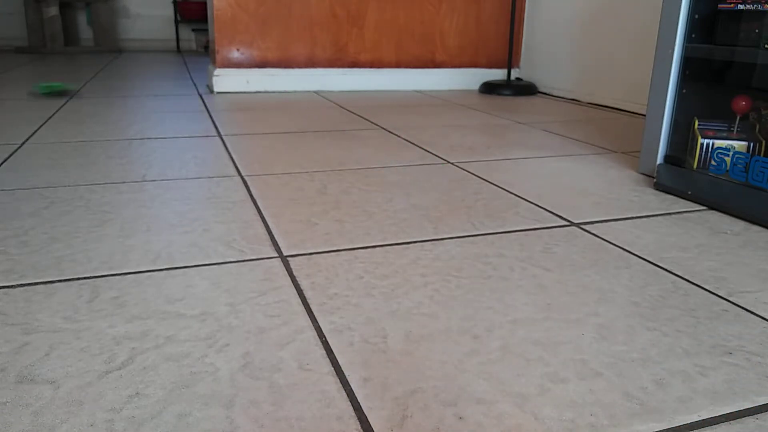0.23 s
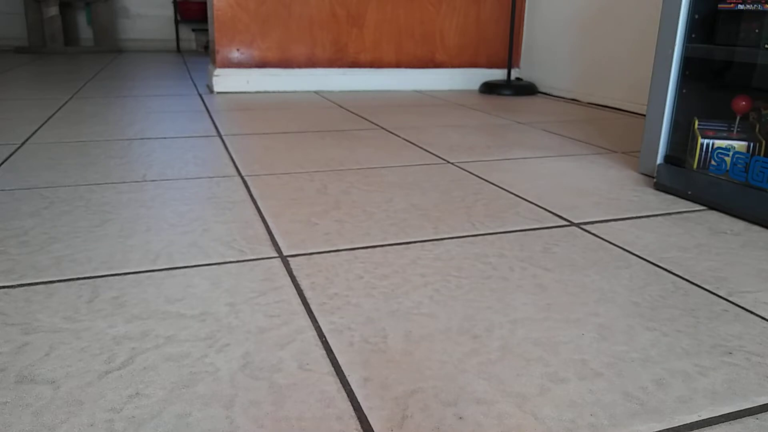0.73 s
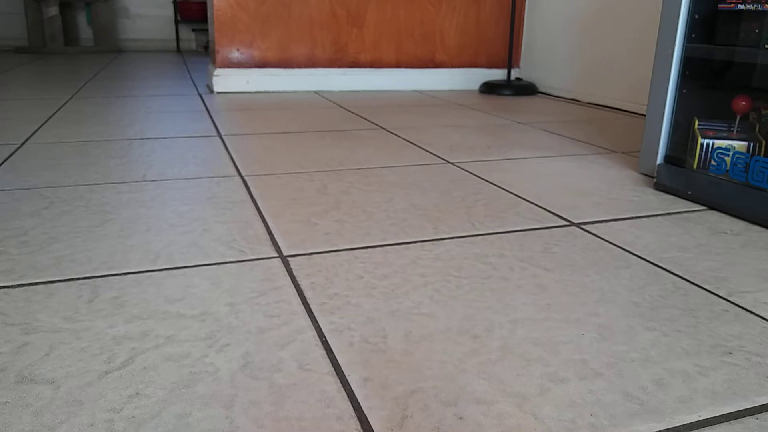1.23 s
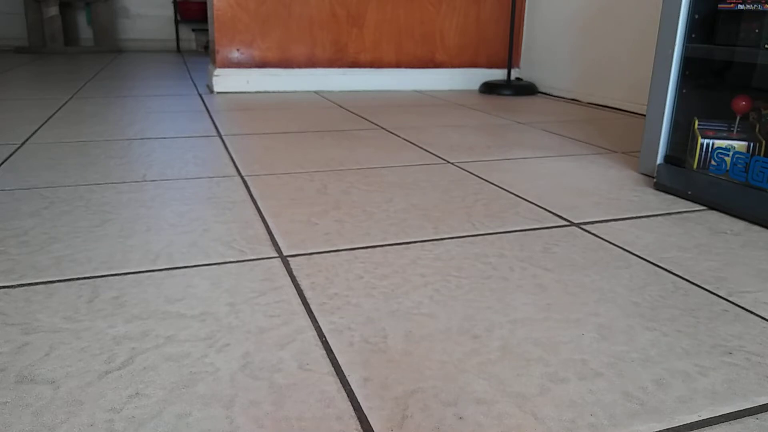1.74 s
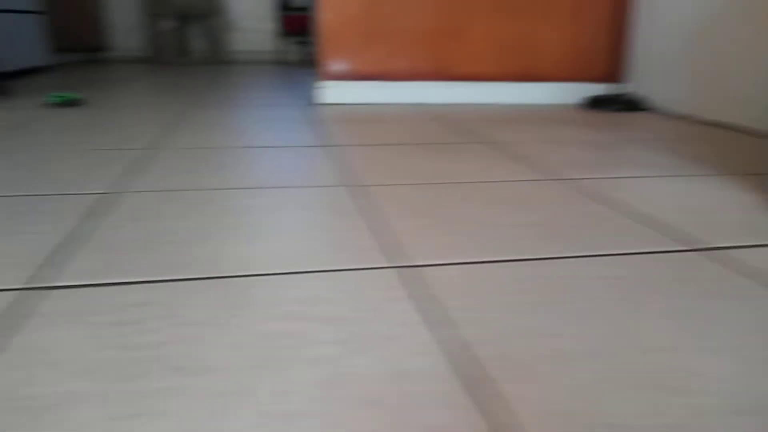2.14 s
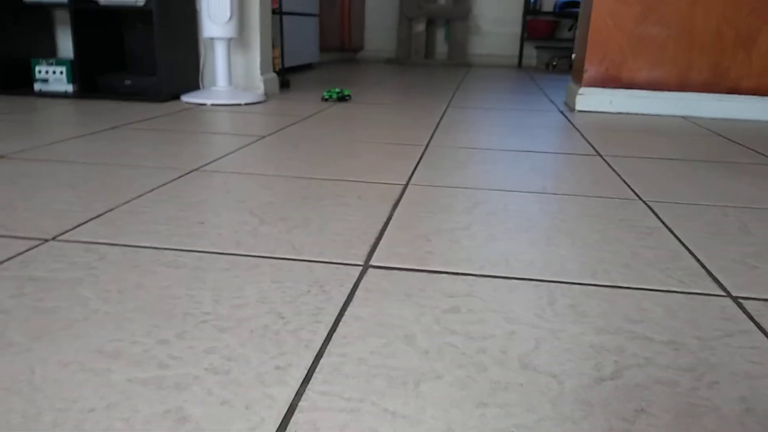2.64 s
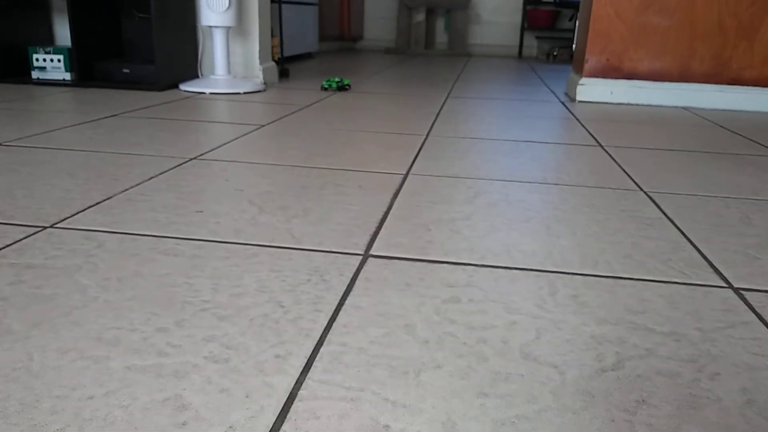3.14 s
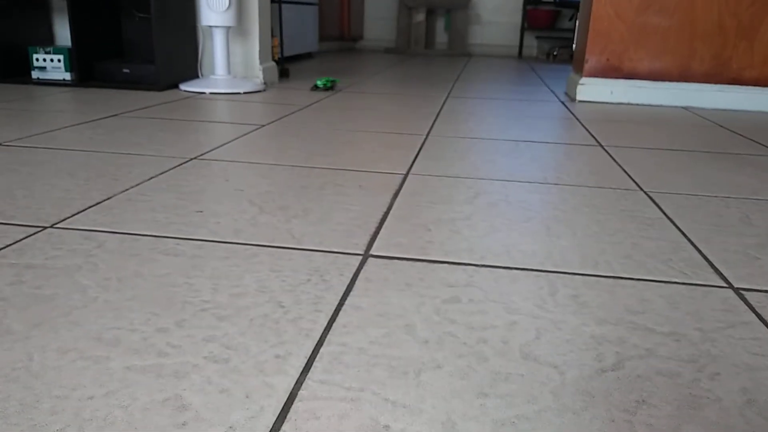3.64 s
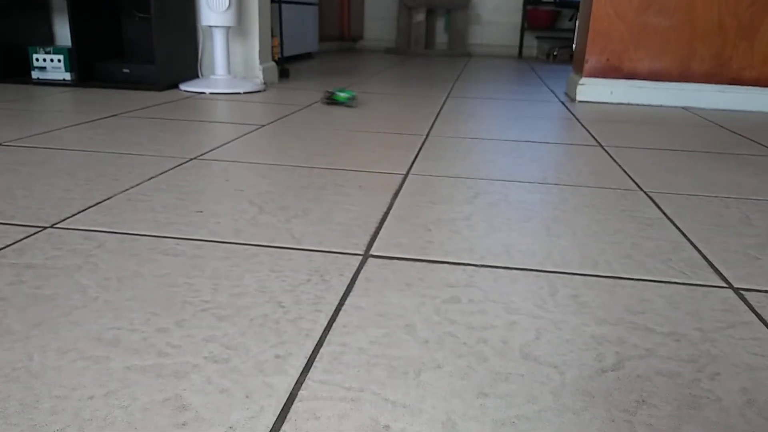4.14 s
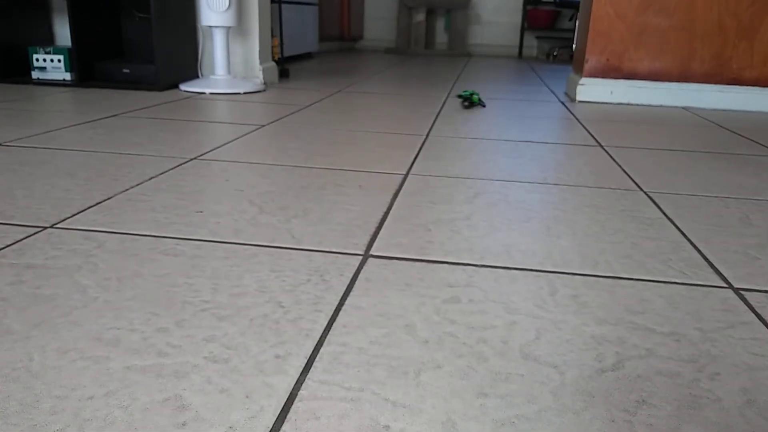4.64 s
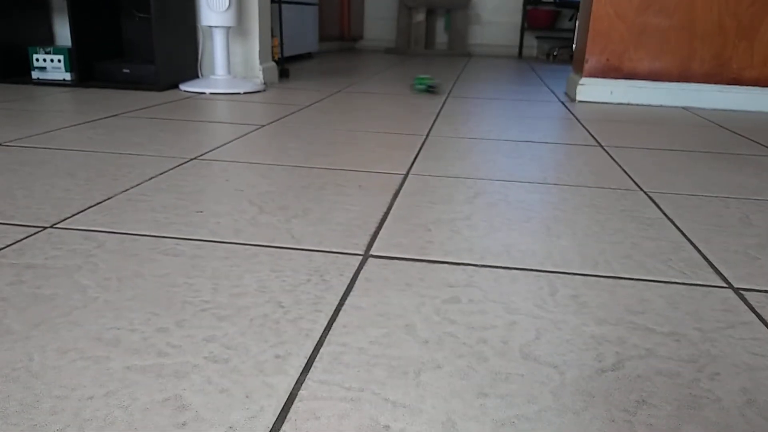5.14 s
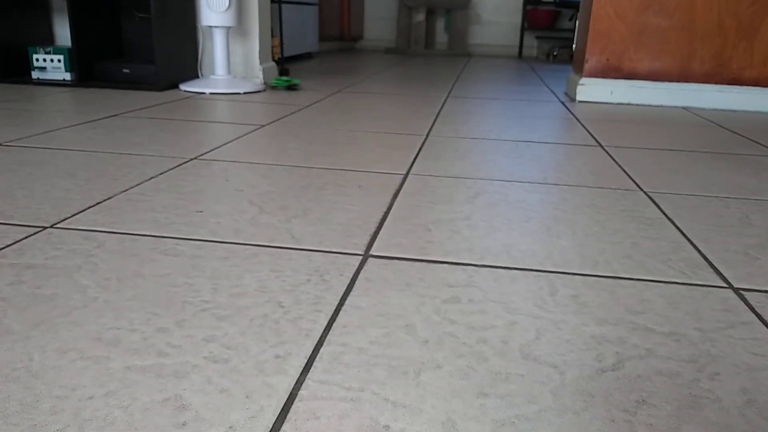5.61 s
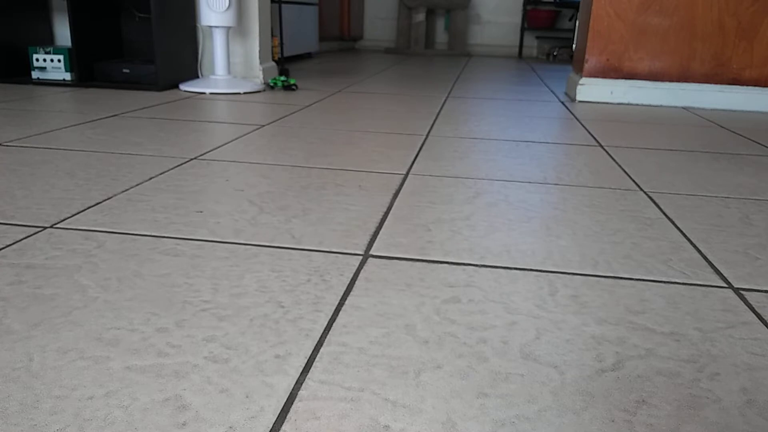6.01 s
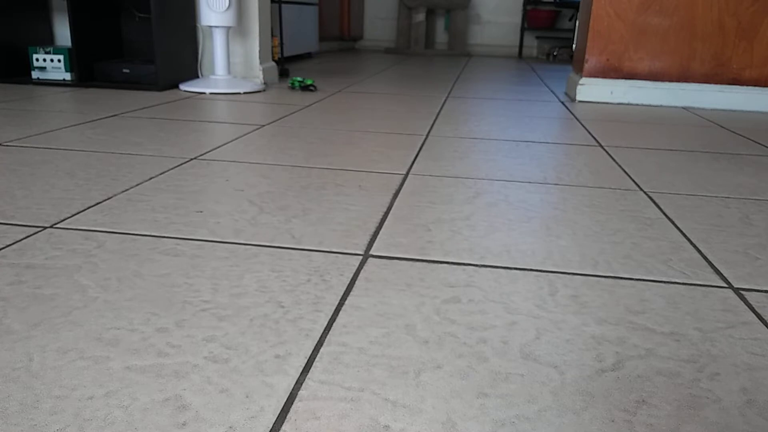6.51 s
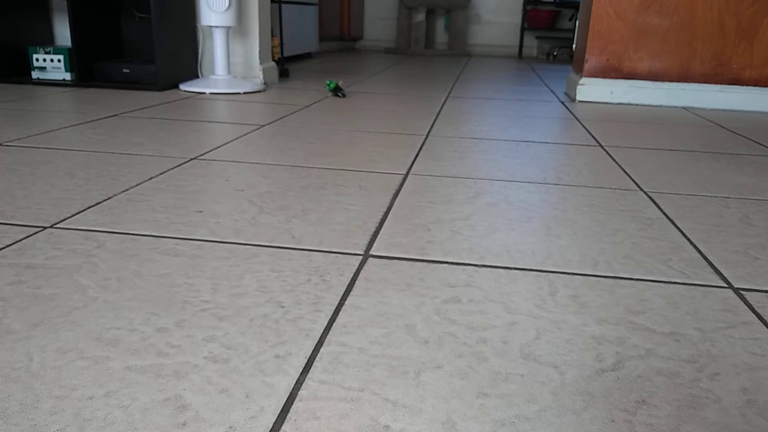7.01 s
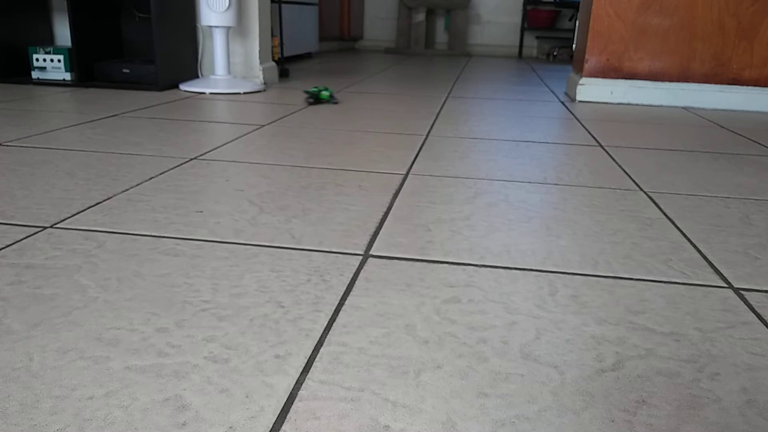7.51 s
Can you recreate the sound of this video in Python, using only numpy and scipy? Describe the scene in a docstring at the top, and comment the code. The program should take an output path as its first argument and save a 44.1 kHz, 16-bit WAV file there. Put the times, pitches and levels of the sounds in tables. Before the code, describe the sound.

Steady bright gear chatter from a small toy on a hard floor, an early crash, sharp controller clicks, a brief scrape and a late soft bump.

```python
"""A tiny remote-control motorcycle whirrs about on a tiled floor: dense random contacts give gear and tyre noise.
It jolts, as noise bursts, and crashes early on: plastic clatter, then struck resonances ringing in a hard room.
The controller's buttons click close by, each a short sine ring and a knock of the shell.
The camera's case is dragged over the floor once, as resonant friction noise; later a faint low hum comes and goes.
Near the end the toy bumps a fan's base. Room air, as filtered noise, lies under it all."""
import sys
import numpy as np
from scipy import signal
from scipy.fft import rfft, irfft, next_fast_len
from scipy.io import wavfile
from scipy.ndimage import uniform_filter1d, map_coordinates

SR = 44100
rng = np.random.default_rng(int(sys.argv[2]) if len(sys.argv) > 2 else 0)


def bounce(signal):
    """Save signal as a 16-bit WAV file at the path given by the first command-line argument."""
    frames = np.transpose(np.atleast_2d(signal))
    limited = np.clip(frames, -1, 1)
    pcm = np.round(limited * 32767).astype(np.int16)
    wavfile.write(sys.argv[1], SR, pcm)


N = 342298

# spectrum of the gears, also of the shaken parts: (frequency [Hz], relative density [dB per Hz])
GEAR_SPECTRUM = [(1500, -46), (2300, -7), (2750, -5), (3200, -10.5), (4000, -7.5), (5400, -6), (6900, 0),
                 (7600, -2), (8600, -8.5), (10200, -17), (12000, -20.5), (13000, -19), (14200, -20),
                 (15600, -19)]


def amp(db):
    """Decibels to amplitude gain: 20 dB is a factor of ten."""
    return 10 ** (np.asarray(db) / 20)


def unit(x):
    """Normalisation to an rms of 1."""
    return x / np.sqrt(np.mean(x ** 2) + 1e-20)


def along(points, hz):
    """Interpolation of (frequency [Hz], value) points on a logarithmic frequency axis."""
    f, v = np.transpose(points)
    return np.interp(np.log(hz + 1), np.log(f + 1), v)


def curves(rows):
    """Linear interpolation in time: one curve for each column after the time."""
    s, *cols = np.transpose(rows)
    return [np.interp(np.arange(N) / SR, s, c) for c in cols]


def wobble(rate):
    """Slow random modulation: a smooth curve through random knots, rate of them a second."""
    return map_coordinates(rng.standard_normal(1024), [np.arange(N) * rate / SR], mode="wrap")


def held(rows, rise_s, fall_s):
    """First-order lag: (time [s], length [s], height) events approach their height, then decay; all are summed."""
    t = np.arange(N) / SR
    total = np.zeros(N)
    for s, length, height in rows:
        rise = 1 - np.exp(-np.clip(t - s, 0, length) / rise_s)
        fall = np.exp(-np.maximum(t - s - length, 0) / fall_s)
        total += height * rise * fall
    return total


def filtered(x, response):
    """Linear filtering: the spectrum of x is multiplied by a response of frequency."""
    m = next_fast_len(len(x) + 8192)
    return irfft(rfft(x, m) * response(np.fft.rfftfreq(m, 1 / SR)), m)[:len(x)]


def coloured(x, spectrum):
    """Spectral shaping by a (frequency [Hz], level [dB]) curve, at rms 1."""
    return unit(filtered(x, lambda hz: amp(along(spectrum, hz))))


def resonant(x, modes):
    """Modal resonance: parallel squared band-pass responses (centre [Hz], width [Hz], level [dB]), at rms 1."""
    def response(f):
        return sum(amp(db) * (1j * f * w / (c * c - f * f + 1j * f * w)) ** 2 for c, w, db in modes)
    return unit(filtered(x, response))


def grit(rate, spread_db):
    """Shot noise: tiny contacts of uneven size at random moments, rate a second, at rms 1."""
    contacts = rng.random(N) < rate / SR
    sizes = rng.standard_normal(N) * amp(spread_db * rng.standard_normal(N))
    return unit(contacts * sizes)


def burst(t, attack, t60):
    """Impact envelope: a quick rise and an exponential decay of 60 dB in t60 seconds."""
    return (1 - np.exp(-t / attack)) * np.exp(-np.log(1000) * t / t60)


def add(track, s, sound):
    """Superposition: a sound is mixed into the track at s seconds."""
    part = track[round(s * SR):][:len(sound)]
    part += sound[:len(part)]


def in_room(x, wet_db):
    """Reverberation: x plus a diffuse noise tail whose decay time depends on frequency."""
    # room decay: (frequency [Hz], t60 [s])
    decay_times = [(150, 0.45), (500, 1), (1200, 0.56), (4000, 0.24), (14000, 0.095)]
    hz, t, z = signal.stft(rng.standard_normal(SR // 2), SR, nperseg=256)
    decay = np.exp(-np.log(1000) * t / along(decay_times, hz)[:, None])
    tail = signal.istft(z * decay, SR, nperseg=256)[1]
    tail = np.pad(tail / np.linalg.norm(tail), (SR // 200, 0))  # unit energy, 5 ms late
    return x + amp(wet_db) * signal.fftconvolve(x, tail)[:len(x)]


def passing_walls(x, echo_db, drift_s, count=6):
    """Comb filtering: near reflections whose paths change interfere with the direct sound."""
    n = np.arange(N)
    out = x.copy()
    for delay in rng.uniform(.001, .012, count):
        lag = (delay + drift_s * wobble(1.1)) * SR
        out += amp(echo_db) * np.interp(n - lag, n, x)
    return out * np.std(x) / np.std(out)  # overall level unchanged


def motorcycle():
    """Dense shot noise: gyro gears and tyres chatter, both following the throttle and fluttering together."""
    # cruising level before throttle and flutter: (time [s], gear hiss [dB], tyres and chassis [dB])
    cruise = [(0, -35, -39.5), (.77, -36, -41), (1.52, -39.5, -43.5), (2.05, -38.5, -49), (2.45, -38, -45),
              (2.74, -39, -47.5), (3.27, -38.5, -48), (3.71, -37, -44), (4.91, -37, -45), (6.77, -38, -44),
              (7.21, -38, -46.5), (7.76, -36, -43)]
    # spurts of throttle: (time [s], length [s], rise approached [dB])
    spurts = [(.29, .07, 2), (.5, 0.037, 8), (1.13, 0.34, 0.5), (1.55, 0.099, 3), (4.1, .13, 2),
              (4.56, 0.052, 2.5), (5.13, .18, 2.5), (5.51, 0.038, 5), (5.69, .1, 1.8), (5.91, 0.046, 2.5),
              (6.19, 0.11, 1.5), (7.56, .2, 1.05)]
    # throttle let go, the toy coasts: (time [s], length [s], drop approached [dB])
    coasts = [(.455, .03, 5), (.8, .18, 6), (1.02, .07, 5), (1.68, 0.04, 4.5), (4.27, .14, 2),
              (4.64, .17, 2.5), (5.33, .15, 3), (6.01, .06, 2), (7.09, 0.045, 1.5)]
    # tyre noise: (frequency [Hz], relative density [dB per Hz])
    tyre_spectrum = [(100, -37.5), (380, -23.5), (510, -13.5), (660, -21), (900, -18), (1080, -11.5),
                     (1230, -15), (1450, -7), (1850, -4), (2200, 1), (2700, -7.5), (3150, -9), (4000, -5),
                     (16000, -27.5)]
    spin_up_s, spin_down_s = .018, .013  # time constants of the drive
    tyre_follows = 1.1  # dB of tyre noise per dB of gear hiss

    gear_db, tyre_db = curves(cruise)
    throttle_db = held(spurts, spin_up_s, spin_down_s) - held(coasts, spin_down_s, spin_up_s)
    flutter = wobble(35)
    gear_gain = amp(gear_db + throttle_db + 0.88 * flutter)
    gears = gear_gain * coloured(grit(rate=9700, spread_db=0.5), GEAR_SPECTRUM)
    tyre_gain = amp(tyre_db + tyre_follows * throttle_db + 1.0 * flutter)
    tyres = tyre_gain * coloured(grit(rate=6000, spread_db=0.5), tyre_spectrum)
    return passing_walls(gears + tyres, echo_db=-16, drift_s=0.0004)


def room_air():
    """Broadband noise: the room's air, steady throughout."""
    # (frequency [Hz], relative density [dB per Hz])
    air_spectrum = [(25, -12), (70, -2.5), (150, -3.5), (450, 0.5), (900, 2), (2000, -3.5), (16000, -33)]
    return amp(-54.5) * coloured(rng.standard_normal(N), air_spectrum)


def jolts():
    """Transient excitation: each jolt shakes the loose plastic parts for a moment."""
    # jolts over joints and skids: (time [s], level [dB])
    jolt_rows = [(.058, -27.5), (.190, -33.5), (.420, -29), (0.4903, -28), (.535, -32), (0.715, -27.5),
                 (4.229, -34), (4.351, -33), (5.415, -31), (5.481, -33)]
    shake, t = np.zeros(N), np.arange(SR // 3) / SR
    for s, db in jolt_rows:
        add(shake, s, amp(db) * burst(t, attack=.0007, t60=0.25))
    shaken = shake * coloured(grit(rate=15000, spread_db=2), GEAR_SPECTRUM)
    # one sharp contact makes a small hard part chink
    chink = amp(-14.0) * np.sin(2 * np.pi * 8300 * t) * burst(t, attack=0.00055, t60=0.015)
    add(shaken, .0585, in_room(chink, wet_db=-9))
    return shaken


def collisions():
    """Impact on a modal body: plastic clatters, upper modes knock briefly and lower ones boom on."""
    # (time [s], thud level [dB], clatter level [dB], dulling frequency [Hz], boom t60 [s])
    blows = [(.570, -12, -12.5, 2425, 0.3), (5.706, -26, -32.5, 483, 0.31), (5.946, -47, -62, 220, 0.2)]
    # modes of the struck toy and furniture: (centre [Hz], width [Hz], relative level [dB])
    thud_modes = [(172, 31, -11), (255, 57, -8), (457, 70, 7), (503, 65, 3.5), (659, 230, 0),
                  (1033, 26, 3.5), (1090, 110, 6.5), (1270, 340, -3.5), (1596, 150, -0.5),
                  (1910, 190, -9.5), (2370, 65, -10)]
    # the toy's plastic: (frequency [Hz], relative density [dB per Hz])
    clatter_spectrum = [(100, -50), (400, -15), (1500, 1.5), (4000, -6.5), (7500, -4), (10500, -18.5),
                        (16000, -26)]
    out, t = np.zeros(N), np.arange(SR // 2) / SR

    def struck(weight):
        return unit(filtered(resonant(rng.standard_normal(len(t)), thud_modes), weight))

    for s, thud_db, clatter_db, dull_hz, t60 in blows:
        upper = struck(lambda hz: hz / (1 + (hz / dull_hz) ** 3))
        knock = amp(6) * upper * burst(t, 0.0052, 0.094)
        lower = struck(lambda hz: 1 / np.sqrt(1 + (hz / (0.79 * dull_hz)) ** 4))
        boom = amp(-1.0) * lower * burst(t, 0.004, t60)
        add(out, s, amp(thud_db) * (knock + boom))
        clatter = coloured(rng.standard_normal(len(t)), clatter_spectrum)
        clatter = amp(clatter_db) * clatter * burst(t, .0015, 0.13)
        add(out, s - .0025, in_room(clatter, wet_db=-5.5))  # the plastic sounds first
    return out


def buttons(clicks, shell, snap_db, snap_t60, knock_db, knock_s, wet_db):
    """Snap-through: a switch gives one short ring while its contacts knock the shell for a few milliseconds."""
    out, t = np.zeros(N), np.arange(SR // 2) / SR
    for s, db, hz in clicks:
        snap = amp(snap_db) * np.sin(2 * np.pi * hz * t) * burst(t, 0.00044, snap_t60)
        contact = (1 - np.exp(-t / 0.00035)) / (1 + (t / knock_s) ** 4)
        knock = coloured(rng.standard_normal(len(t)) * contact, shell) * np.std(contact)
        add(out, s, amp(db) * (snap + in_room(amp(knock_db) * knock, wet_db)))
    return out


def button_presses():
    """Snap-through on the way down: the ring is lower in pitch and longer."""
    # (time [s], level [dB], pitch of the snap [Hz])
    press_rows = [(1.0124, -13.5, 3290), (1.6013, -13, 3300), (4.1664, -13, 3300), (4.8166, -12.5, 3200),
                  (6.1270, -13, 3150)]
    # the controller's shell: (frequency [Hz], relative density [dB per Hz])
    press_shell = [(100, -60), (620, -51), (900, -13), (1500, -20), (2400, -0.5), (3400, 2.5), (4000, -4.5),
                   (4900, -6.5), (6000, -6.5), (8000, -10.5), (10500, -33), (14000, -20.5), (16000, -24.5)]
    return buttons(press_rows, press_shell, snap_db=-1, snap_t60=.025, knock_db=-4, knock_s=.0035, wet_db=-7.5)


def button_releases():
    """Elastic return: the button springs back with a higher, shorter ring."""
    # (time [s], level [dB], pitch of the snap [Hz])
    release_rows = [(1.1104, -13, 8100), (3.463, -14, 6080), (4.4326, -14, 6120), (5.1944, -12.5, 6120),
                    (6.1923, -12.5, 7850)]
    # the controller's shell: (frequency [Hz], relative density [dB per Hz])
    release_shell = [(100, -60), (600, -31), (900, -26), (2000, -8.5), (3300, -4), (5000, -3.5), (6300, 4),
                     (7600, -4), (9500, -4), (11500, -21), (14500, -10.5), (16000, -17)]
    return buttons(release_rows, release_shell, snap_db=1, snap_t60=.014, knock_db=-3, knock_s=.0028, wet_db=-10)


def camera_drag():
    """Friction-excited resonance: the case rubs over the tile, its body droning over uneven grit."""
    # a first slide, then a harder push: (time [s], length [s], body level [dB], grit level [dB])
    pushes = [(2.085, 0.45, -52.5, -42.5), (2.208, 0.24, -44.5, -34.5)]
    # low and high modes of the case: (centre [Hz], width [Hz], relative level [dB])
    case_low = [(291, 68, 10), (418, 104, 7)]
    case_high = [(956, 200, -12.5), (1320, 176, -2), (1570, 180, 0), (1866, 90, -4), (2657, 280, -2.5),
                 (2842, 230, 2), (3260, 400, -5.5), (4620, 900, -12)]
    rise_s, body_fall_s, grit_fall_s = 0.0091, 0.086, 0.029  # time constants
    drone = held([(s, length, amp(db)) for s, length, db, _ in pushes], rise_s, body_fall_s)
    scrape = held([(s, length, amp(db)) for s, length, _, db in pushes], rise_s, grit_fall_s)
    catches = grit(rate=2500, spread_db=1.0) * amp(1.4 * wobble(70))
    body = drone * resonant(grit(rate=3300, spread_db=3.0), case_low)
    return body + scrape * resonant(catches, case_high)


def low_hum():
    """Phase modulation: an unsteady 82 Hz tone with low noise around it comes and goes faintly."""
    # (time [s], length [s], level approached [dB])
    hum_rows = [(4.62, 0.5, -64), (5.067, 0.42, -55.5), (5.68, 0.76, -53.5), (7.564, 0.082, -55)]
    level = held([(s, length, amp(db)) for s, length, db in hum_rows], rise_s=.025, fall_s=0.077)
    phase = 2 * np.pi * 82 * np.arange(N) / SR + 0.53 * wobble(14)
    # (frequency [Hz], relative density [dB per Hz])
    rumble_spectrum = [(40, -43), (80, -3.5), (150, -7.5), (300, -36.0), (1000, -68)]
    rumble = coloured(rng.standard_normal(N), rumble_spectrum)
    return level * (np.sin(phase) + 0.63 * rumble)


def scene():
    """Superposition: every source adds at one microphone, heard alike on both sides."""
    toy = motorcycle() + jolts() + collisions()
    clicks = button_presses() + button_releases()
    mono = toy + clicks + camera_drag() + room_air() + low_hum()
    return np.array([mono, mono])


def suppressed(x, depth_db, knee_db):
    """Downward expansion: each band is turned down while weak, so the hiss has a wavering lower edge."""
    # level under which a band is turned down: (frequency [Hz], density [dB per Hz])
    threshold = [(100, -55.5), (200, -84.5), (500, -82), (1000, -82.5), (1500, -84.5), (2300, -88.5),
                 (5000, -100), (12000, -115)]
    hz, _, z = signal.stft(x, SR, nperseg=1024, noverlap=768, scaling="psd")
    # power smoothed over 3 bands and 7 frames
    power = uniform_filter1d(uniform_filter1d(2 * np.abs(z) ** 2, size=3, axis=0), size=7, axis=1)
    over_db = 10 * np.log10(np.abs(power) + 1e-20) - along(threshold, hz)[:, None]
    gain = amp(depth_db * (1 - np.tanh(over_db / knee_db)) / 2)
    return signal.istft(z * gain, SR, nperseg=1024, noverlap=768, scaling="psd")[1][:N]


def record(dry):
    """Band limiting: the camera suppresses low noise, thins the deep bass and cuts the top treble."""
    def band(hz):
        return hz ** 2 / (hz ** 2 + 25 ** 2) * (hz < 15780)
    return np.array([filtered(suppressed(side, depth_db=-15.5, knee_db=0.5), band) for side in dry])


dry = scene()
out = record(dry)
bounce(out)
```